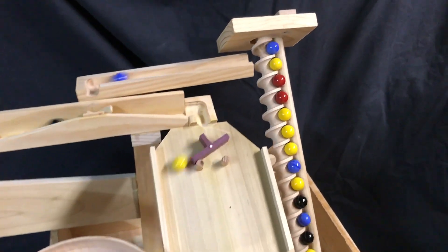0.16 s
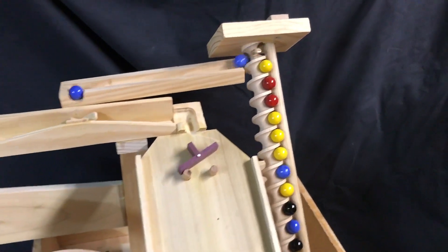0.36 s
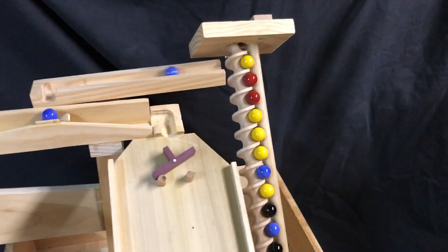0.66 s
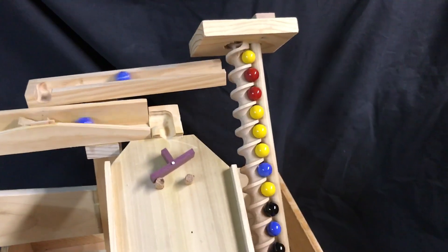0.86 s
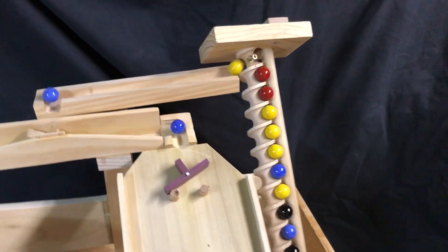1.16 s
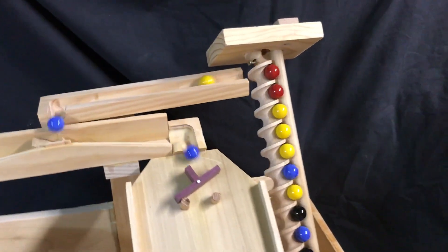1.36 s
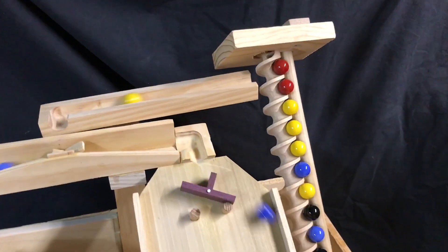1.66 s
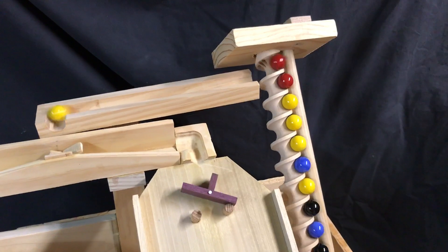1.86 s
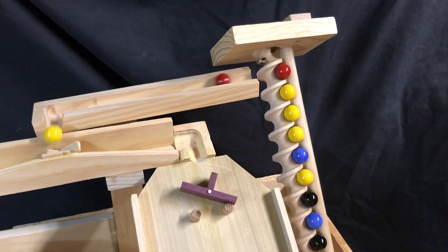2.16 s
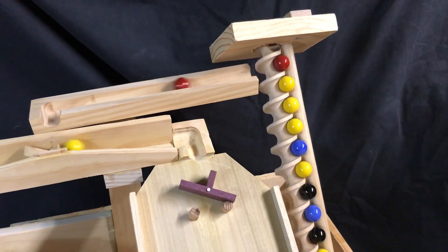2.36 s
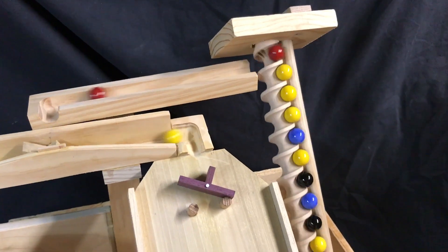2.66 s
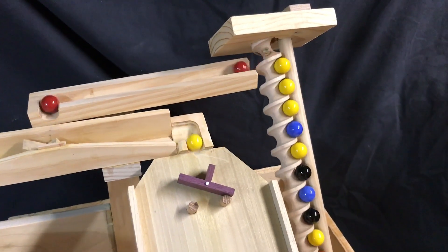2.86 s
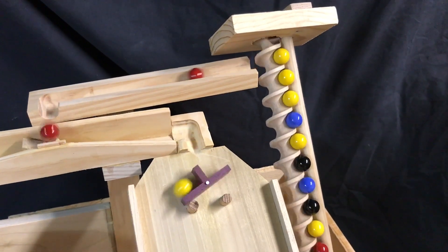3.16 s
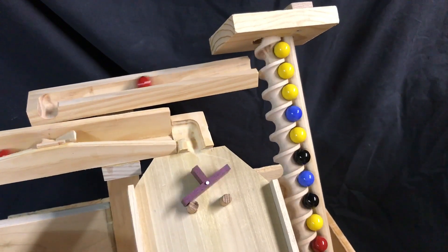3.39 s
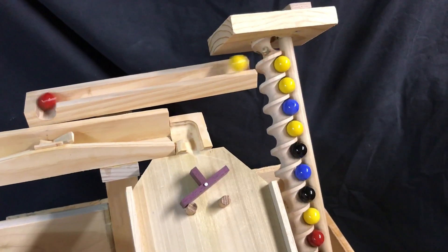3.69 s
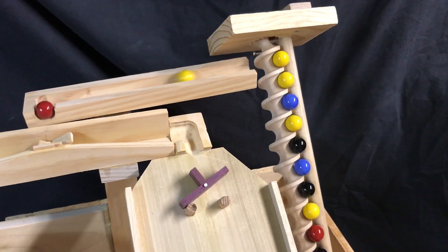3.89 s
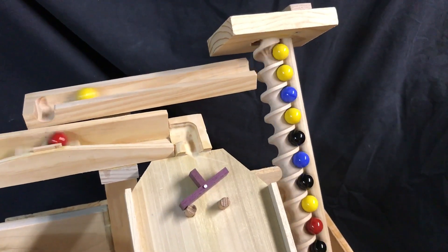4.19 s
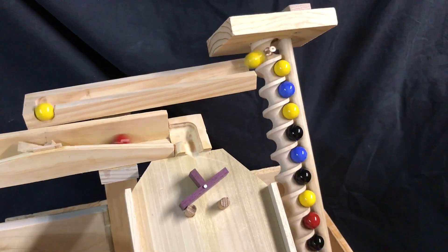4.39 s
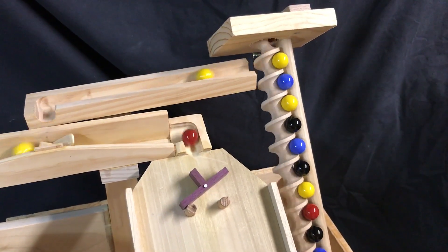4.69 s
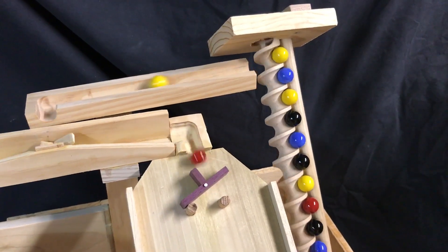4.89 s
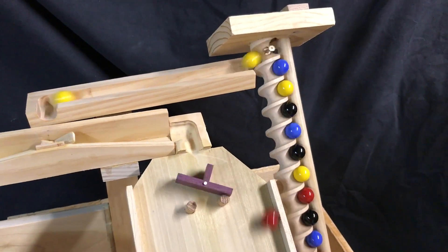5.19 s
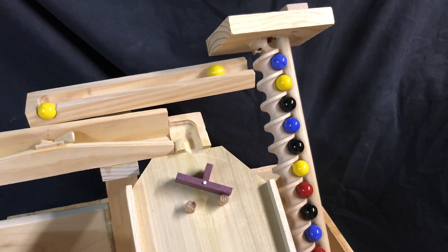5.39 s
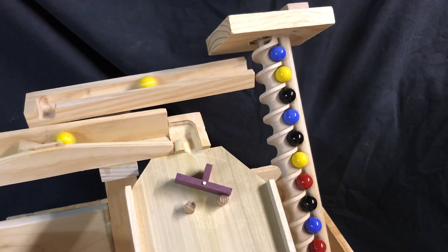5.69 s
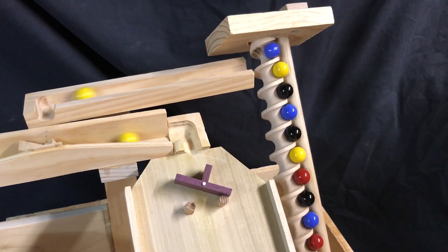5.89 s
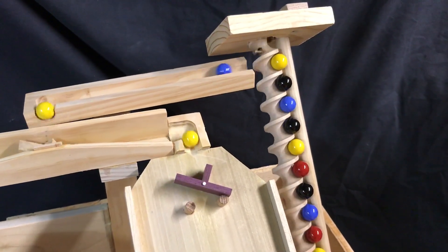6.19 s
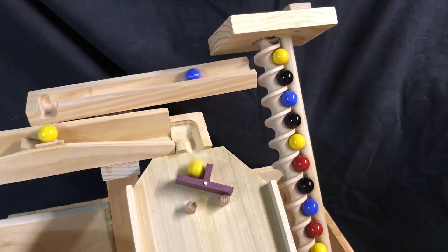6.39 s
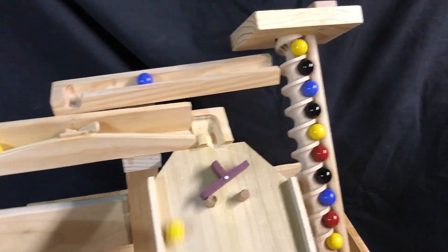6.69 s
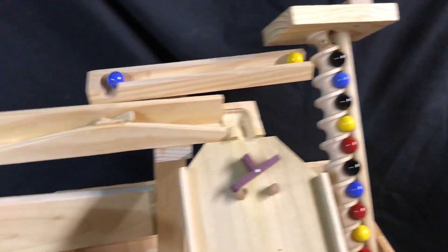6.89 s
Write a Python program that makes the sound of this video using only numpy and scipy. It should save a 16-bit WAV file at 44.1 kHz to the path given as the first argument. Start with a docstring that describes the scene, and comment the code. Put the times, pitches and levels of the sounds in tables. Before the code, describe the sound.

Marbles clack, knock and click through a wooden marble machine in a dense uneven clatter over low wooden rolling rumble, close up in a small room.

```python
"""A wooden marble machine runs in a small room, close to the microphone.
It opens with a marble dropping onto a ramp; more drops follow to the end, the strongest at about 5.7 s.
Between drops, marbles knock on wood and click together; wood and glass are shaped, decaying tones and noise.
In every turn of the screw lift, marbles are caught and rubbed, the rolling surges, and a thin squeak sounds.
Four low swells come from the bowl; shaped noise makes the rumble, hum and hiss that last throughout."""
import sys
import numpy as np
from scipy import signal
from scipy.fft import rfft, irfft, next_fast_len
from scipy.io import wavfile

SR = 44100
rng = np.random.default_rng(int(sys.argv[2]) if len(sys.argv) > 2 else 0)


def dump_mix(stems):
    """Bounce the given channels to the path in sys.argv[1] as a 16-bit WAV at rate SR."""
    frames = np.atleast_2d(stems).T  # one column per channel
    limited = np.clip(frames, -1, 1)  # hard clip at full scale
    pcm = np.round(limited * 32767).astype(np.int16)
    wavfile.write(sys.argv[1], SR, pcm)


N = 310905
TIME = np.arange(N) / SR
RING = TIME[:SR // 7]  # time axis of one ringing sound [s]
TURN_S = 0.806  # one turn of the screw lift


def gain_of(db):
    """Turns decibels into amplitude."""
    return 10 ** (np.asarray(db) / 20)


def evened(x):
    """Scales a sound to an rms (average strength) of 1."""
    return x / np.sqrt(np.mean(x ** 2) + 1e-20)


def read(points, hz):
    """Reads between the points of a table on a log-frequency axis."""
    f, value = np.transpose(points)
    return np.interp(np.log(hz + 1), np.log(f + 1), value)


def bump(hz, centre, octaves):
    """A bell of height 1 on the log-frequency axis."""
    return np.exp(-(np.log2((hz + 1) / centre) / octaves) ** 2)


def add(mix, s, sound):
    """Mixes a sound in at time s."""
    part = mix[max(round(s * SR), 0):][:len(sound)]
    part += sound[:len(part)]


def noise(colour):
    """Noise of rms 1 whose spectrum in dB is the function colour."""
    fast = next_fast_len(N)
    hz = np.fft.rfftfreq(fast, 1 / SR)
    shaped = rfft(rng.standard_normal(fast)) * gain_of(colour(hz))
    return evened(irfft(shaped, fast)[:N])


def scattered(count):
    """Times [s] spread over the scene, one at random in each equal slot."""
    return (np.arange(count) + rng.random(count)) * N / SR / count


# resonances of the whole frame: (frequency [Hz], relative lift [dB])
FRAME = [(280, 5.5), (394, 3.5), (731, -0.5), (1114, 1.5), (1342, 2), (1540, 1.5), (2174, 6.5), (2780, 1),
         (5460, 0)]


def frame_db(hz):
    """The frame favours its own resonances, whatever shakes it."""
    return sum(lift_db * bump(hz, f, octaves=0.064) for f, lift_db in FRAME)


# colour of a blow on wood: (frequency [Hz], relative level [dB])
WOOD = [(180, -36), (350, -18), (600, -6.5), (1100, 1), (2000, 0.5), (3500, 3), (5500, 1.5), (7500, -5.5),
        (10500, -12), (14000, -9), (17000, -33)]


def strike(rows, ring_db=7, tone_db=13, t60=0.077, damping=0.65, rise_cycles=1.03, count=280):
    """Blows ring the dense modes of the timber, each spot its own mix, plus the tone of the struck piece.

    Each row is (time [s], relative level [dB], brightness [dB per octave], tone [Hz]).
    """
    hz = np.geomspace(180, 17000, count) * 2 ** rng.uniform(-1 / 100, 1 / 100, count)
    octave = np.log2(hz / 1000)[:, None]
    cycles = hz[:, None] * RING
    # high modes die first; low bending waves take longer to build up
    decay = gain_of(-60 * RING / (t60 * 2 ** (-damping * octave)))
    rise = 1 - np.exp(-cycles / rise_cycles)
    modes = np.exp(2j * np.pi * cycles) * decay * rise

    s, strength, brightness, ring_hz = np.transpose(rows)[:, :, None]

    def colour(f):
        return strength + read(WOOD, f) + brightness * np.log2(f / 2000)

    mode_db = colour(hz) + frame_db(hz) + ring_db * bump(hz, ring_hz, octaves=0.13)
    spot_size = rng.exponential(1 / 2, mode_db.shape)
    spot = spot_size * np.exp(2j * np.pi * rng.random(mode_db.shape))
    timber = ((gain_of(db) * mix) @ modes for db, mix in zip(mode_db, spot))
    # high tones die sooner
    tone_t60 = 2.7 / np.sqrt(ring_hz)
    tone_gain = gain_of(colour(ring_hz) + tone_db - 60 * RING / tone_t60)
    tone = tone_gain * np.sin(2 * np.pi * ring_hz * RING)

    out = np.zeros(N)
    for at, ringing, piece_tone in zip(s[:, 0], timber, tone):
        add(out, at, ringing.real + piece_tone)
    return out


# wooden pieces that the marbles hit: name -> tone at which it rings [Hz]
PIECES = {"rim": 995, "bowl": 1108, "board": 1340, "rail": 1555, "wall": 2150, "ramp": 2760, "rocker": 3390,
          "peg": 3950, "edge": 5450}
# a marble hits wood: (time [s], relative level [dB], brightness [dB per octave], piece [name])
KNOCKS = [(0.1054, -33.5, -1, "wall"), (.2548, -38, -1, "ramp"), (0.3606, -28.5, -1, "edge"),
          (0.4366, -27.5, -2.5, "wall"), (.476, -27.5, 0, "board"), (0.4966, -32, 0, "wall"),
          (0.5402, -32, 1.5, "board"), (0.6063, -34, -0.5, "edge"), (0.7077, -35, 1, "bowl"),
          (0.951, -34, -3.5, "ramp"), (1.1052, -34, -3.5, "board"), (1.177, -43.5, -7, "bowl"),
          (1.2328, -25.5, 0, "rocker"), (1.2653, -34.5, -3, "bowl"), (1.3019, -26.5, -2, "edge"),
          (1.3164, -37, -2, "peg"), (1.342, -35, -.5, "ramp"), (1.6127, -32.5, -1, "peg"),
          (1.6621, -29.5, 0.5, "rim"), (1.725, -29.5, 0.5, "rim"), (1.7956, -34.5, -4.5, "rocker"),
          (1.932, -23.5, -1, "ramp"), (1.9724, -31, -2.5, "rail"), (2.0544, -27, -2, "board"),
          (2.112, -27.5, 0.5, "edge"), (2.169, -29.5, 2, "bowl"), (2.207, -35.5, -1.5, "board"),
          (2.267, -36, -1, "board"), (2.5405, -31, -2, "ramp"), (2.7637, -39, -6, "bowl"),
          (2.7898, -33, -3, "bowl"), (2.8242, -26.5, -1, "rocker"), (2.8732, -33.5, -5, "bowl"),
          (2.902, -26.5, -2, "peg"), (2.9066, -28, 1.5, "edge"), (2.9524, -32, 0.5, "rocker"),
          (3.201, -28.5, -1.5, "rocker"), (3.4142, -39, -3.5, "ramp"), (3.497, -36, -3.5, "ramp"),
          (3.5597, -28.5, -3.5, "board"), (3.6241, -30, -1, "peg"), (3.7375, -35, -5, "wall"),
          (3.786, -34, -2, "bowl"), (3.8077, -29, -1, "rail"), (3.8516, -29, 0.5, "rocker"),
          (3.8783, -29.5, -1.5, "rail"), (4.1138, -36.5, -4, "ramp"), (4.3373, -33, -3.5, "board"),
          (4.406, -26.5, 1, "rail"), (4.4454, -30.5, 0, "rocker"), (4.4706, -30.5, -1.5, "rail"),
          (4.5055, -33, -4, "wall"), (4.56, -27, 1, "edge"), (4.7779, -29.5, -3.5, "bowl"),
          (4.869, -40.5, -2.5, "ramp"), (5.076, -36, -4.5, "rim"), (5.2079, -28, -2, "rocker"),
          (5.3044, -33, -3.5, "bowl"), (5.3411, -31.5, -3.5, "edge"), (5.415, -30.5, -2.5, "rail"),
          (5.4351, -25, .5, "rim"), (5.7136, -39.5, -5, "board"), (5.8901, -33.5, -3, "ramp"),
          (5.9363, -39, -6, "ramp"), (6.1, -31, -3.5, "bowl"), (6.1099, -30.5, -2.5, "edge"),
          (6.1558, -32, -3.5, "bowl"), (6.183, -26, -2.5, "rail"), (6.2352, -28.5, -0.5, "rocker"),
          (6.2502, -31, -3.5, "rim"), (6.312, -30.5, -.5, "rail"), (6.3337, -37, -1, "rail"),
          (6.6976, -37.5, -2.5, "ramp"), (6.823, -40, -7, "rocker"), (6.873, -37.5, -3.5, "rim"),
          (6.905, -31.5, -4, "bowl"), (6.9432, -24.5, -0.5, "bowl"), (7.007, -27.5, -0.5, "peg")]


def knocks(level_db=1, detune=0.022, rebound_db=-14.0, rebound_s=0.011, rebound_dulling=4.4):
    """Marbles hit wooden pieces, never on quite the same spot, then settle with a softer, duller touch."""
    rows = [(*blow, PIECES[piece]) for *blow, piece in KNOCKS]
    s, strength, brightness, ring_hz = np.transpose(rows)
    flight, size, pitch, spot = rng.random((len(s), 4)).T
    blows = np.c_[s, strength, brightness, ring_hz * (1 + detune * (2 * spot - 1))]
    # each rebound comes after 0.5 to 2.5 times rebound_s
    rebounds = np.c_[
        s + rebound_s * (1 / 2 + 2 * flight),
        strength + rebound_db + 6 * (size - 1 / 2),
        brightness - rebound_dulling,
        1000 * 2 ** pitch,
    ]
    return gain_of(level_db) * strike(np.r_[blows, rebounds])


# modes of the ramp under a drop: (frequency [Hz], relative level [dB], time to fade by 60 dB [s])
RAMP = [(491, -8.5, 0.19), (546.8, 0.5, 0.12), (1105, 1.5, 0.034), (1247, -1, 0.028), (1711, 1, 0.037),
        (1903, 0.5, 0.028), (2254, 6.5, 0.017), (2500, 7, 0.0056), (2778, 11.5, 0.012), (2880, 6.5, 0.013),
        (4390, -11.5, 0.041), (6500, -7, 0.017)]
# a marble drops onto a ramp: (time [s], relative level [dB], time until it lands again [s])
DROPS = [(0.0447, -12, 0.0068), (0.719, -12, .008), (1.5111, -11.5, 0.0046), (2.3066, -11.5, 0.012),
         (3.273, -12, .007), (4.19, -10.5, 0.0086), (4.6472, -10.5, .013), (5.6553, -7.5, 0.019),
         (6.495, -13, 0.0051)]


def drops(level_db=-1.5, bounce_db=-22, crack_db=-27, bounce_brightness=-1.4, swell_s=0.014):
    """A hard first contact rings the ramp; the duller second landing shakes the frame."""
    out = np.zeros(N)
    hz, db, t60 = np.transpose(RAMP)[:, :, None]
    # the hollow low modes swell last
    swell = 1 - np.exp(-RING / swell_s * (hz / hz[0]) ** 2)
    for s, strength, _ in DROPS:
        # no two marbles land on quite the same spot
        detune, phase = rng.normal(1, 0.009, hz.shape), rng.random(hz.shape)
        ring = gain_of(db - 60 * RING / t60) * np.sin(2 * np.pi * (hz * detune * RING + phase))
        add(out, s, gain_of(strength + level_db) * (ring * swell).sum(0))
    cracks = [(s, strength + crack_db, 1.2, 2600) for s, strength, _ in DROPS]
    bounces = [(s + flight, strength + bounce_db, bounce_brightness, 1200)
               for s, strength, flight in DROPS]
    return out + strike(cracks + bounces)


# marble against marble: (time [s], relative level [dB])
CLICKS = [(0.0626, -27), (0.1566, -27), (0.174, -31), (.2295, -36.5), (.864, -39), (1.5358, -27.5),
          (1.8352, -33.5), (1.9182, -30), (2.4561, -36.5), (3.0737, -32.5), (3.132, -29.5), (3.2335, -28),
          (3.265, -29), (3.444, -29.5), (3.4799, -35), (4.3285, -35.5), (4.7978, -39), (5.053, -27),
          (5.077, -29.5), (5.1357, -20.5), (5.806, -35.5), (6.4593, -28.5), (6.5173, -28.5), (6.616, -30.5)]
# colour of a click between marbles: (frequency [Hz], relative level [dB])
GLASS = [(1000, -3.5), (3000, 2.5), (5500, 2), (9000, 0.5), (10500, -7), (14300, -5), (16500, -32)]


def clicks(level_db=12, snap_s=0.0025, ring_db=-17, rebound_db=-12, rebound_s=0.029):
    """Marbles meet in a very short snap with a faint ring of the track, then touch again, mostly lighter."""
    s, db = np.transpose(CLICKS)
    # each second touch comes after 0.5 to 2 times rebound_s
    rebound_at = s + rebound_s * rng.uniform(1 / 2, 2, len(s))
    rebounds = np.c_[rebound_at, db + rebound_db + 3 * rng.standard_normal(len(s))]
    envelope = np.exp(-RING / snap_s) + gain_of(ring_db) * np.exp(-RING / 0.005)
    touches = np.zeros(N)
    for at, strength in [*CLICKS, *rebounds]:
        add(touches, at, gain_of(strength + level_db) * envelope)
    return touches * noise(lambda hz: read(GLASS, hz))


# in every turn the screw catches and rubs the marbles:
# (time into the turn [s], length [s], relative rub level [dB], relative knock level [dB])
RUBS = [(.008, 0.0078, -32.5, -47.5), (0.137, .036, -30.5, -35.5), (0.248, 0.044, -44, -49),
        (0.776, 0.016, -30, -43.5)]


def screw(jitter_s=0.003, slips_per_s=420, slip_s=0.00083, spread_db=4, brightness=-3.6,
          ring_hz=3900, dulling_db=3.5):
    """Each catch of the screw is a light knock, then a short run of tiny slips of wood on glass."""
    slips, catches = np.zeros(N), []
    for turn_s in np.arange(0, TIME[-1], TURN_S):
        for s, length, rub_db, knock_db in RUBS:
            at = turn_s + s + jitter_s * rng.standard_normal()
            fade = np.exp(-(RING / length) ** 4)
            slipping = rng.random(len(RING)) < slips_per_s / SR
            size = np.clip(rng.standard_normal(len(RING)), -2, 2)
            add(slips, at, slipping * gain_of(rub_db + spread_db * size) * fade)
            catches.append((at, knock_db, brightness, ring_hz * rng.uniform(0.9, 1.1)))
    # every slip dies away over slip_s
    rub = signal.lfilter([1], [1, -np.exp(-1 / (slip_s * SR))], slips)
    grit = noise(lambda hz: read(GLASS, hz) - dulling_db * np.log2(1 + hz / ring_hz))
    return rub * grit + strike(catches)


def taps(level_db=-44.5, spread_db=3, brightness=-1.9, follow=0.72, count=42):
    """Marbles nudge the same wooden pieces lightly, more strongly when they roll hard."""
    s = scattered(count)
    piece, size = rng.random((count, 2)).T
    ring_hz = np.array([*PIECES.values()])[(piece * len(PIECES)).astype(int)]
    strength = level_db + follow * bustle(s) + spread_db * (2 * size - 1)
    return strike(np.c_[s, strength, np.full(count, brightness), ring_hz])


def chatter(level_db=-54, spread_db=4.5, brightness=-3.3, tone_db=16, count=320):
    """Rolling marbles hop over the grain and brush the rails, more strongly when they roll hard."""
    s = scattered(count)
    size, hardness = np.clip(rng.standard_normal((count, 2)).T, -2, 2)
    ring_hz = 1400 * 2 ** rng.uniform(0, 3 / 2, count)
    strength = level_db + bustle(s) + spread_db * size
    return strike(np.c_[s, strength, brightness + 1.5 * hardness, ring_hz], tone_db=tone_db)


def bustle(t, turn_db=7.0, release_s=0.46, rise_s=0.0032, settle_s=0.12, stir_db=29, stir_s=0.029):
    """How hard marbles roll, in dB: a surge that settles in every turn, and a swell after each knock."""
    since = (t - release_s) % TURN_S
    surge = gain_of(turn_db) ** 2 * (1 - np.exp(-since / rise_s)) * np.exp(-since / settle_s)
    for s, db, *_ in KNOCKS:
        age = np.maximum(t - s, 0) / stir_s
        surge = surge + gain_of(db + stir_db) ** 2 * age * np.exp(1 - age)
    return 10 * np.log10(1 + surge)


# colour of the rumble: (frequency [Hz], relative level per Hz [dB])
RUMBLE = [(18, -49), (45, -43), (90, -7.5), (189, -14), (273, 0), (512, 6), (1010, 8), (1860, -10.5),
          (4300, -69), (10000, -56)]


def rolling(level_db=-37.5, flutter_db=3, resonance=2.2, follow=0.81):
    """Rough wood under the marbles keeps the frame rumbling unevenly."""
    flutter = noise(lambda hz: -20 * np.log10(1 + (hz / 25) ** 2))
    rumble = noise(lambda hz: read(RUMBLE, hz) + resonance * frame_db(hz))
    # worked out at every 200th sample, then joined by straight lines
    swell_db = np.interp(TIME, TIME[::200], bustle(TIME[::200]))
    return rumble * gain_of(level_db + follow * swell_db + flutter_db * flutter)


# the bowl booms under circling marbles: (time [s], level [dB])
BOWL = [(.29, -39), (3.55, -35), (4.9, -36.5), (6.74, -35)]


def bowl(centre_hz=205, swell_s=0.036):
    """Short low swells of noise as marbles swing round the bowl."""
    swell = sum(gain_of(db) * np.exp(-((TIME - s) / swell_s) ** 2) for s, db in BOWL)
    return swell * noise(lambda hz: -20 * np.log2((hz + 1) / centre_hz) ** 2)


def lift(hum_hz=154, width_hz=9, level_db=-55, squeak_db=-47):
    """The drive of the screw lift hums unsteadily, and the screw gives a thin squeak once a turn."""
    hum = noise(lambda hz: -20 * np.log10(1 + ((hz - hum_hz) / width_hz) ** 2))
    # one squeak falls at squeak_at_s, the others whole turns before and after it
    squeak_at_s, squeak_s, squeak_hz = 1.076, 0.005, 15500
    from_squeak = (TIME - squeak_at_s + TURN_S / 2) % TURN_S - TURN_S / 2
    squeak = noise(lambda hz: -20 * np.log10(1 + ((hz - squeak_hz) / 600) ** 2))
    squeak = squeak * np.exp(-(from_squeak / squeak_s) ** 2)
    return gain_of(level_db) * hum + gain_of(squeak_db) * squeak


# reverberation of the room: (frequency [Hz], time to fade by 60 dB [s])
ROOM = [(1000, 0.18), (14000, 0.1)]


def room(x, delay_s=0.0013):
    """A diffuse tail that swells after the first wall is reached, each band dying at its own speed."""
    hz, t, z = signal.stft(rng.standard_normal(SR // 2), SR, nperseg=256)
    fading = z * gain_of(-60 * t / read(ROOM, hz)[:, None])
    tail = signal.istft(fading, SR, nperseg=256)[1]
    tail = tail * (1 - np.exp(-(TIME[:len(tail)] / delay_s) ** 2))
    return signal.fftconvolve(x, tail / np.linalg.norm(tail))[:N]


# steady hiss of the room: (frequency [Hz], relative level per Hz [dB])
HISS = [(500, 9.5), (2500, -16), (5000, -9), (9000, -11), (16000, -24)]


def hiss(level_db=-50.5):
    """Faint even air under everything, made of steady shaped noise."""
    return gain_of(level_db) * noise(lambda hz: read(HISS, hz))


def scene():
    """All parts of the machine, the echo of its wood and glass, and the hiss of the room."""
    wood = knocks() + drops() + taps() + chatter()
    glass = clicks() + screw()
    echo = room(gain_of(-12) * (wood + glass))
    background = rolling() + bowl() + lift() + hiss()
    return (wood + glass + echo + background)[None]


def record(dry):
    """The microphone thins the deep bass, the loudest peaks are rounded off; then the treble is cut."""
    bass_cut = signal.butter(3, 45, "highpass", fs=SR, output="sos")
    thin = signal.sosfilt(bass_cut, dry)
    rounded = thin / (1 + thin ** 6) ** (1 / 6)
    treble_cut = signal.firwin(511, 16500, window=("kaiser", 9), fs=SR)
    return signal.oaconvolve(rounded, treble_cut[None], "same")


dry = scene()
out = record(dry)
dump_mix(out)
```